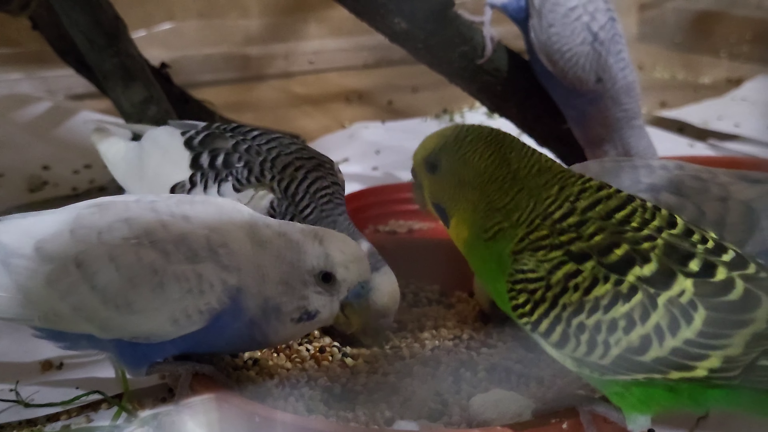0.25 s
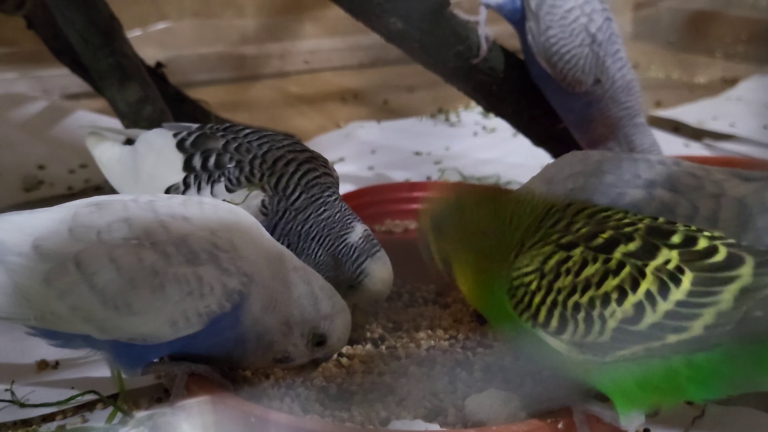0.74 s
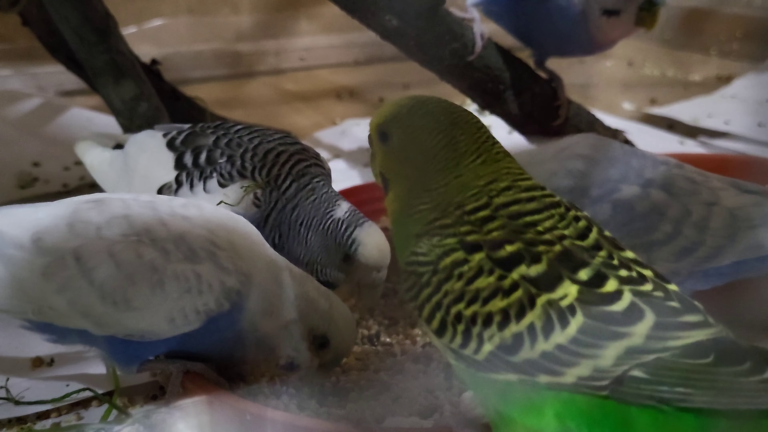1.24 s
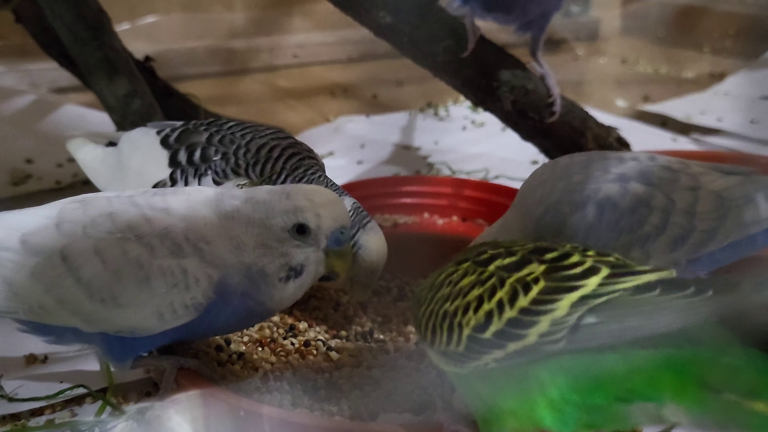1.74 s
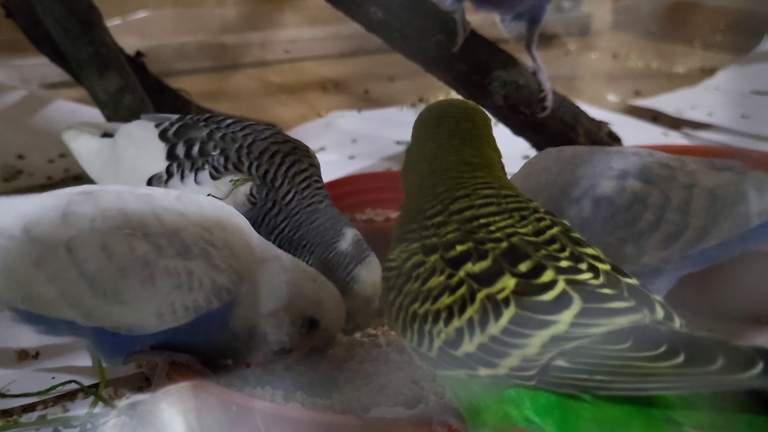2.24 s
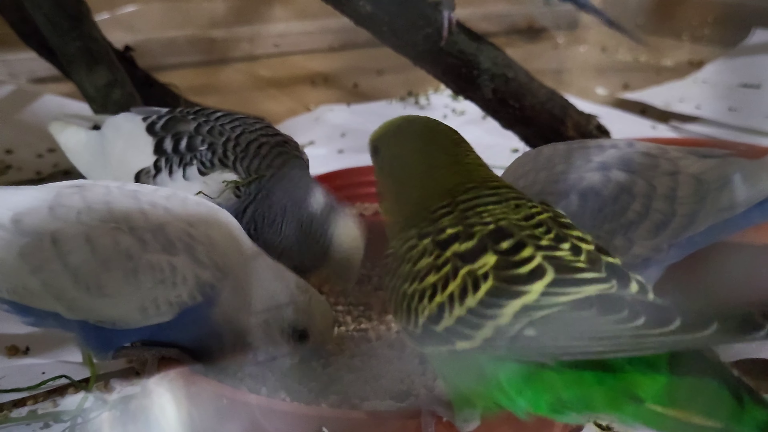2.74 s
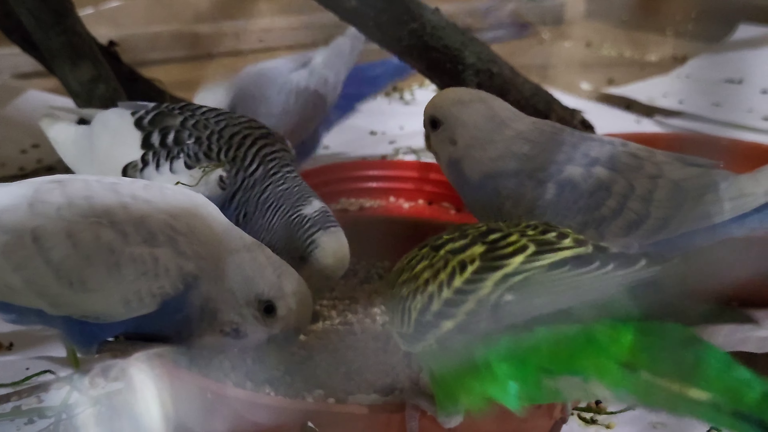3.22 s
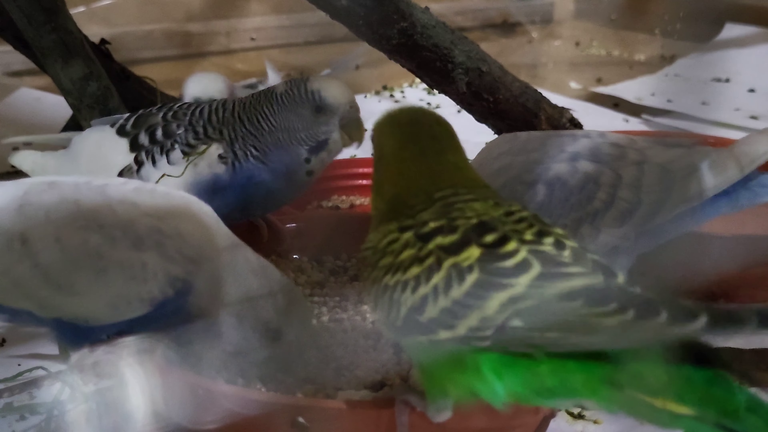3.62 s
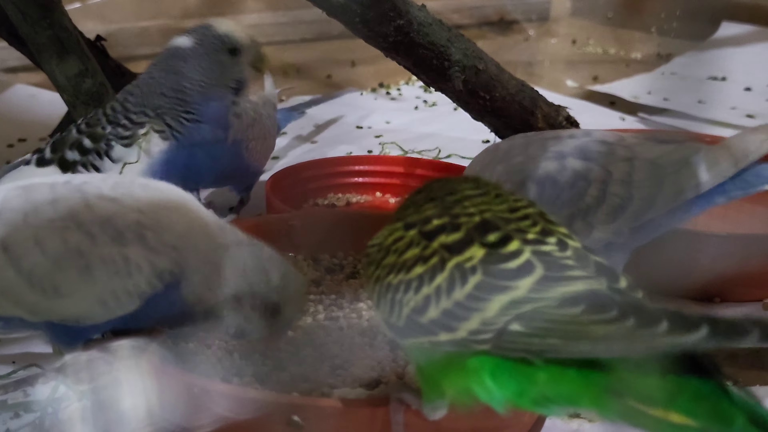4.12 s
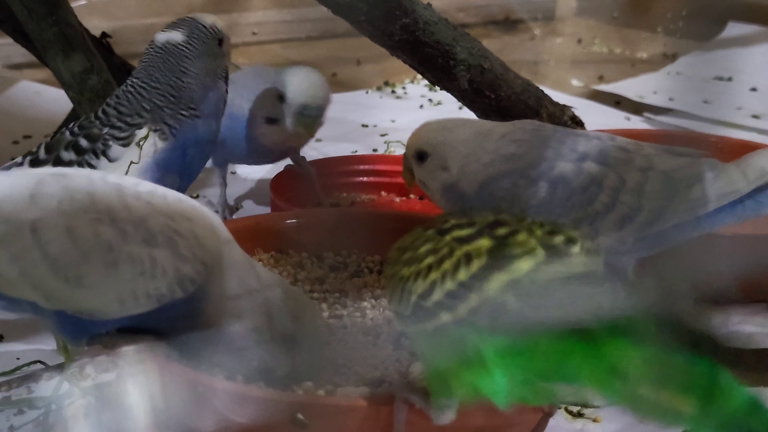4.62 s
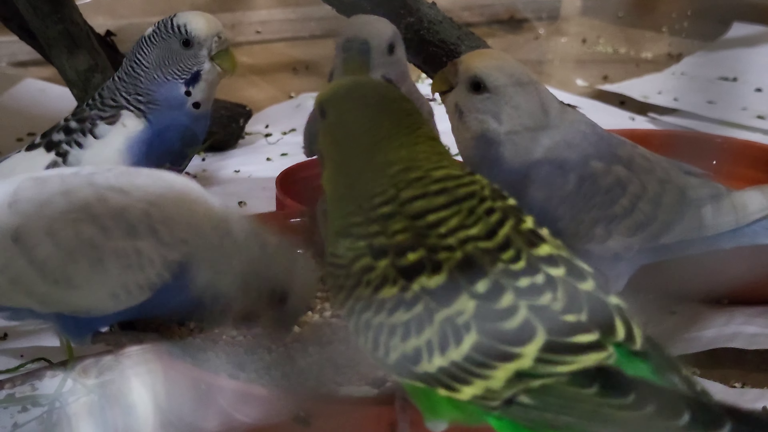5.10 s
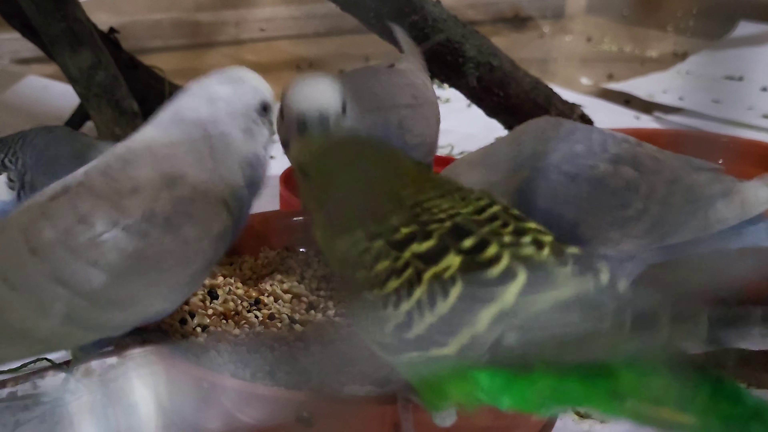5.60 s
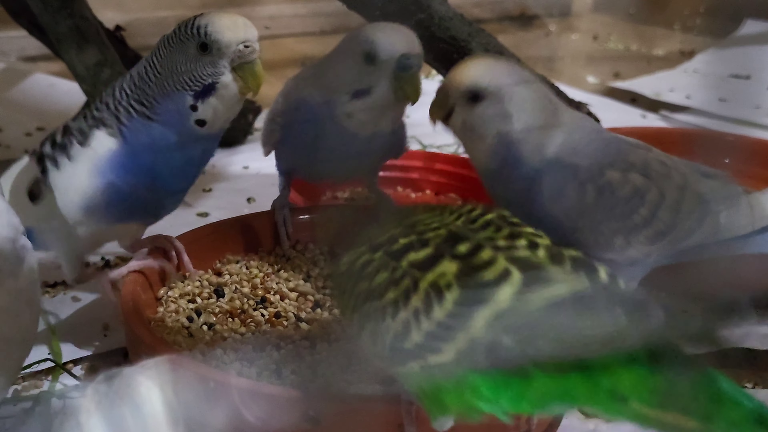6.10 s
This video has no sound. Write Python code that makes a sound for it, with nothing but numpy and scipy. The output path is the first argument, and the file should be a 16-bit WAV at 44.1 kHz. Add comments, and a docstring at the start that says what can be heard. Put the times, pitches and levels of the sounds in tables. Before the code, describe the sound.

Small birds feed at a seed dish: bright clicks, faint nibbling, dull taps, tiny chups and late wing scuffles above a steady drone.

```python
"""A fan drones throughout, narrow bands of noise over the soft rush of a quiet small room.
Left of centre and close to the microphone, budgerigars feed from seed dishes: husks crack as
bright bursts of noise, beaks turn seeds in faint ticks and knock a damped, ringing dish.
Feathers rustle as crackling, filtered noise and snap in duller bursts as the birds shove and flutter;
they mutter short chups, each a few harmonics. Early echoes and a short tail answer the birds."""
import sys
import numpy as np
from scipy import signal
from scipy.fft import rfft, irfft
from scipy.io import wavfile
from scipy.ndimage import uniform_filter1d

SR = 44100
rng = np.random.default_rng(int(sys.argv[2]) if len(sys.argv) > 2 else 0)


def store_wav(level_fs):
    """Save 16-bit WAV to argv[1]."""
    pcm = np.round(np.clip(np.atleast_2d(level_fs), -1, 1) * 32767)
    wavfile.write(sys.argv[1], SR, pcm.T.astype(np.int16))


N = 280035


def amp(db):
    """Decibels to gain."""
    return 10 ** (np.asarray(db) / 20)


def unit(x):
    """Scales to an rms of 1."""
    return x / np.sqrt(np.mean(x ** 2) + 1e-20)


def read(points, hz):
    """Reads a table on a log-frequency axis."""
    f, value = np.transpose(points)
    return np.interp(np.log(hz + 1), np.log(f + 1), value)


def colour(x, points):
    """Filters by a spectrum in dB."""
    size = x.shape[-1]
    return irfft(rfft(x) * amp(read(points, np.fft.rfftfreq(size, 1 / SR))), size)


def pan(db):
    """Gains of the two channels for a left-right difference; positive leans left."""
    gains = amp([[db / 2], [-db / 2]])
    return gains / gains.mean()


def add(mix, s, sound):
    """Mixes a stereo sound in at time s."""
    part = mix[:, max(round(s * SR), 0):][:, :sound.shape[1]]
    part += sound[:, :part.shape[1]]


def wander(rate_hz):
    """Slow random movement, rms 1, mostly below rate_hz."""
    hz = np.fft.rfftfreq(N, 1 / SR)
    return unit(irfft(rfft(rng.standard_normal(N)) * np.exp(-(hz / rate_hz) ** 2), N))


# Rush of the empty room, spectrum: f/Hz, relative level/dB
AIR_SPECTRUM = [(12, -69), (20, -29), (96, -5.5), (120, 0.5), (182, -14.5), (248, -12.5), (310, -16.5),
                (357, -16.5), (678, -27), (1910, -36.5), (2390, -37), (5530, -47.5), (7730, -46),
                (10800, -57.5), (16000, -54.5)]
# How alike left and right hear that rush: f/Hz, correlation (0 to 1)
AIR_LIKENESS = [(30, 0.89), (120, 1), (250, 0.86), (500, 0.39), (1000, 0.051), (2500, 0.033), (8000, 0.03)]
AIR_DB = -49  # rms of the 500-2000 Hz band in the mean of the channels, before panning


def air(side_db=2.0):
    """The steady rush of the room is shaped noise, nearly mono in the bass and wide above."""
    hz = np.fft.rfftfreq(N, 1 / SR)
    a, b = rfft(rng.standard_normal((2, N)))
    alike = np.clip(read(AIR_LIKENESS, hz), 0, 1)
    right = alike * a + np.sqrt(1 - alike ** 2) * b
    z = np.array([a, right]) * amp(read(AIR_SPECTRUM, hz))
    middle_rms = irfft(z.mean(0) * (hz > 500) * (hz < 2000), N).std()
    return amp(AIR_DB) * pan(side_db) * irfft(z, N) / middle_rms


# Resonances of the fan: f/Hz, width/Hz (offset at which the band is 12 dB down),
# level/dB rms before the level curve
FAN_BANDS = [(80, 6.4, -47.5), (120.3, 9.6, -31), (125.4, 14, -42), (201.7, 24, -49.5), (250.1, 12.4, -46),
             (358, 20.6, -46.5), (583, 63, -56), (829.4, 19, -61.5), (1256, 360, -84), (2457, 22, -66.5)]
# Level of the deep drone over time: t/s, relative level/dB
DEEP_LEVEL = [(0.05, -25), (0.28, -25), (0.43, -31.5), (0.55, -24.5), (0.75, -22.5), (1.0, -29.5),
              (1.42, -24), (1.72, -31), (2.1, -24), (2.5, -28.5), (3.18, -24), (3.6, -29.5), (3.9, -25.5),
              (4.73, -27), (4.9, -31.5), (5.1, -21), (5.3, -28), (6.3, -26)]


def fan(side_db=-0.5, window_s=0.17):
    """Narrow bands of noise; the deep ones follow a level curve that stands for their chance wavering."""
    hz = np.fft.rfftfreq(N, 1 / SR)
    deep, high = np.zeros(N), np.zeros(N)
    for centre, width, db in FAN_BANDS:
        phases = np.exp(2j * np.pi * rng.random(len(hz)))
        band = irfft(phases / (1 + ((hz - centre) / width) ** 2) ** 2, N)
        part = deep if centre < 170 else high
        part += amp(db) * unit(band)
    # the noise's own slow level is divided out, so that the table sets the level
    own_level = unit(np.sqrt(uniform_filter1d(deep ** 2, int(window_s * SR))))
    level_curve = unit(amp(np.interp(np.arange(N) / SR, *np.transpose(DEEP_LEVEL))))
    return pan(side_db) * (deep * level_curve / own_level + high)


# Decay of the small room: f/Hz, time to fall 60 dB/s
ROOM_DECAY = [(300, 0.13), (1500, 0.29), (3000, .40), (8000, 0.23), (16000, 0.18)]


def room(x, near_db, tail_db, size=22050, count=12):
    """Early echoes from dishes and cage, then a short diffuse tail that fades at its own rate per band."""
    t = np.arange(size) / SR
    noise = rng.standard_normal((2, size)) * (1 - np.exp(-t / 0.00068))
    hz, when, z = signal.stft(noise, SR, nperseg=256)
    fade = amp(-60 * when / read(ROOM_DECAY, hz)[:, None])
    tail = signal.istft(z * fade, SR, nperseg=256)[1][:, :size]
    response = amp(tail_db) * tail / np.linalg.norm(tail[0])
    for channel in response:
        delay_s = 0.001202 + .012 * rng.random(count) ** 2
        taps = rng.choice([-1, 1], count) * np.exp(-delay_s / 0.022)
        channel[(delay_s * SR).astype(int)] += amp(near_db) * taps / np.linalg.norm(taps)
    source = unit(x[0] + .5 * x[1]) * np.sqrt(np.mean(x ** 2))
    return x + pan(3.2) * signal.fftconvolve(source[None], response, axes=1)[:, :N]


# How the right channel hears the birds: f/Hz, level/dB
RIGHT_SIDE = [(2000, 1.5), (4500, 2.5), (6000, -4), (9000, 5), (12000, 5.5), (15500, 0)]


def from_left(x, lag_samples=3):
    """The birds are left of centre: the right side hears them a few samples later and coloured."""
    return np.array([x[0], np.roll(colour(x[1], RIGHT_SIDE), lag_samples)])


# Beaks knocking on the dish: t/s, relative level/dB
KNOCKS = [(0.607, -41.5), (1.7507, -35.5), (3.277, -36), (3.3932, -36), (4.5, -35.5), (4.744, -37),
          (4.977, -41.5), (5.127, -45.5)]
# Modes of the seed-filled dish: nominal f/Hz, relative level/dB, time to fall 60 dB/s
DISH_MODES = [(1380, 9, 0.0048), (1940, 1.5, 0.006), (2480, -14, 0.0063)]


def knocks(level_db=9, side_db=4, size=700):
    """A beak reaches through the seed and hits the dish, whose modes the seed damps at once."""
    t, out = np.arange(size) / SR, np.zeros((2, N))
    onset = 1 - np.exp(-t / 0.00046)
    for s, db in KNOCKS:
        shifts = rng.uniform(0.77, 1.3, len(DISH_MODES))  # each knock detunes the modes
        ring = np.zeros(size)
        for (hz, mode_db, t60), shift in zip(DISH_MODES, shifts):
            ring += amp(mode_db - 60 * t / t60) * np.sin(2 * np.pi * hz * shift * t)
        add(out, s, amp(level_db + db) * pan(side_db) * ring * onset)
    return out


def click(spectrum, treble_db, body_db, ring_hz, rise, decay, after_db, after, alike, size=1024, lead_in=64):
    """A fracture: noise swells and dies within milliseconds, with one resonance of the thing that broke."""
    t = np.maximum(np.arange(size) - lead_in, 0) / SR  # rise, decay and after are in seconds
    hz = np.fft.rfftfreq(size, 1 / SR)
    shape = (1 - np.exp(-t / rise)) ** 2 * (np.exp(-t / decay) + amp(after_db) * np.exp(-t / after))
    noise = rng.standard_normal((3, size))
    z = rfft((noise[:2] + alike * noise[2]) * shape)  # the third noise is common to both sides
    z /= np.sqrt(uniform_filter1d(abs(z) ** 2, size=50, axis=1))  # every band gets its share of the energy
    z *= 1 + 1.4 / (1 + 1j * (hz - ring_hz) / 380)
    tilt = [(4000, body_db), (5000, 0), (9000, 0), (11000, treble_db)]
    return irfft(z * amp(read(spectrum, hz) + read(tilt, hz)))


# Spectrum of a splitting husk, before each tick's ring and tilt: f/Hz, relative level/dB
HUSK_SPECTRUM = [(500, -19), (1200, -0.5), (2600, 2.5), (4000, -2.5), (5500, 0.5), (7600, 2), (9500, 0.5),
                 (12000, 4), (15000, 7), (17000, 9)]


def nibbling(count=70, ticks=3, bout_s=.05, faintest_db=-35, spread_db=14):
    """Seeds turned in beaks and shifted in the dish: little bouts of faint ticks, most barely there."""
    out = np.zeros((2, N))
    for start, side in rng.random((count, 2)):
        for when, strength, treble, body, ring in rng.random((ticks, 5)):
            tick = click(HUSK_SPECTRUM, -14 + 12 * treble, -8 + 10 * body, 4000 + 5000 * ring,
                         rise=0.00024, decay=0.00074, after_db=-34, after=0.0027, alike=0.21)
            gain = amp(faintest_db + spread_db * strength ** 2)
            add(out, start * N / SR + bout_s * when, gain * pan(-3 + 11 * side) * tick)
    return out


def catches(per_s=300, spread_db=6.5, count=10):
    """Separate little snags of barbs and seeds at random instants, each kind with its own ring."""
    out = np.zeros((2, N))
    for ring_hz in np.geomspace(2500, 9000, count):
        strength = amp(spread_db * np.minimum(rng.exponential(1, N), 2.5))
        train = (rng.random(N) < per_s / count / SR) * strength
        snag = click([(100, 0), (17000, 0)], 0, 0, ring_hz,
                     rise=.0003, decay=.0005, after_db=-25, after=.003, alike=.6)
        out += signal.oaconvolve(train[None], snag, axes=1)[:, :N]
    return unit(out)


STROKE_ATTACK_S, STROKE_RELEASE_S = 0.011, 0.019


def stroke(t, length):
    """A stroke takes hold quickly, lasts its length, then the feathers settle; t is seconds after its start."""
    return np.clip(t / STROKE_ATTACK_S, 0, 1) * np.exp(-np.maximum(t - length, 0) / STROKE_RELEASE_S)


# Feather strokes as the birds shove and flutter: start t/s, length/s, relative level/dB
STROKES = [(3.239, 0.039, -29.5), (3.35, 0.17, -47.5), (3.68, .1, -56), (3.985, 0.019, -36.5),
           (4.08, 0.2, -42.5), (4.264, 0.076, -34.5), (4.372, 0.12, -42.5), (4.72, 0.13, -45.5),
           (5.32, 0.051, -39), (5.406, 0.03, -34), (5.733, 0.1, -39), (5.87, 0.091, -38.5),
           (5.95, 0.11, -34.5), (6.201, 0.11, -38)]
# Spectrum laid on the rustle of feathers: f/Hz, relative level/dB
FEATHER_SPECTRUM = [(710, -52), (1200, -9), (1570, -25), (1680, -2.5), (1870, -17), (2300, -9.5),
                    (3590, -4), (4040, -3), (5710, -0.5), (7820, -0.5), (11700, -16.5), (15200, -8),
                    (16000, -14), (17000, -50)]


def feathers(level_db=-2, flutter_db=2, side_db=5, thrust_db=-12):
    """Barbs slip over each other: a crackle in an uneven swish, with a lower push of air in each stroke."""
    t = np.arange(N) / SR
    effort = np.max([amp(db) * stroke(t - start, length) for start, length, db in STROKES], axis=0)
    swish = amp(-5.5) * rng.standard_normal((2, N))
    slips = (catches() + swish) * amp(flutter_db * wander(39))
    rustle = unit(colour(slips, FEATHER_SPECTRUM))
    thrust = unit(colour(slips, [(100, -27), (500, 11), (1200, -10), (2500, -10), (6000, -39)]))
    return amp(level_db) * pan(side_db) * effort * (rustle + amp(thrust_db) * thrust)


# Wing tips and claws striking: t/s, relative level/dB, body below 4 kHz against 5-9 kHz/dB, ring f/Hz
SNAPS = [(3.2401, -24, -5, 7100), (3.2643, -22.5, -0.5, 7200), (3.2713, -36, 2, 7650),
         (3.3536, -24.5, -10.5, 5860), (3.4605, -29, -0.5, 5700), (3.997, -28.5, 0.5, 3970),
         (4.1109, -32, 3.5, 5330), (4.149, -23, -3.5, 5800), (4.3242, -25.5, 1, 5700),
         (4.459, -28.5, -11, 7550), (5.3484, -16, -5, 7700), (5.449, -26, -18, 5640),
         (5.7316, -17.5, 1.5, 6530), (5.759, -19, -3, 6200), (5.8726, -28.5, -6, 7200),
         (5.9425, -11, -2, 7050), (5.9984, -18.5, -16, 7040), (6.0175, -22.5, -1.5, 7750),
         (6.094, -28, -12, 5600), (6.213, -28, 0, 7200), (6.2573, -24, -10, 7550), (6.2737, -32, 4, 6600),
         (6.3038, -20.5, -8, 6000)]
# Spectrum of a struck quill, before each snap's ring and tilt: f/Hz, relative level/dB
QUILL_SPECTRUM = [(300, -1.5), (1200, -8), (2500, 0), (3600, 3.5), (4500, 2), (7000, 1), (9000, -6),
                  (12000, 0), (15000, -4), (17000, -10)]
SNAP_TREBLE_DB = -10  # treble above 10 kHz at the usual strength
SNAP_DULLING = 0.29  # dB of treble lost for each dB that a blow is harder than usual


def wings(level_db=21.0, lead_s=0.0024, side_db=8):
    """Stiff feathers and claws strike the rim and the paper: duller and longer than a husk."""
    out = np.zeros((2, N))
    usual_db = np.mean([row[1] for row in SNAPS])
    for s, db, body_db, ring_hz in SNAPS:
        treble_db = SNAP_TREBLE_DB - SNAP_DULLING * (db - usual_db)
        snap = click(QUILL_SPECTRUM, treble_db, body_db, ring_hz,
                     rise=0.00024, decay=0.00035, after_db=-5, after=0.0032, alike=0.16)
        add(out, s - lead_s, amp(level_db + db) * pan(side_db) * snap)
    return out


# Chups: middle t/s, length/s, pitch f/Hz, rise/octaves, level/dB, tilt/dB per harmonic, overtone reach f/Hz
CHUPS = [(0.7, 0.0056, 1214, 0.2, -20, -4.5, 3470), (0.7878, 0.0039, 2130, 0.54, -26, -22, 6000),
         (4.5636, 0.003, 2240, -0.6, -33.5, -15, 6000), (4.588, 0.0031, 2220, 0.41, -30.5, -3, 6540),
         (4.7106, 0.010, 2005, 0.37, -33, 3, 6300), (4.8162, 0.0064, 1487, -0.27, -19.5, -8.5, 6000),
         (4.983, 0.0074, 2060, 0.27, -37, -3, 7000), (5.2102, 0.0066, 1733, 0.21, -28.5, 0, 5250),
         (5.298, .006, 1333, -0.28, -26.5, -5, 6500), (5.515, .008, 1254, -0.044, -22, -1.5, 6540),
         (5.6637, 0.0061, 1780, 0.27, -24.5, -15.5, 7000), (6.3046, 0.0038, 3630, -.15, -23, -7, 8000)]
THROAT_HZ, THROAT_WIDTH_HZ, THROAT_DB = 3730, 370, 4  # one resonance lifts the overtone nearest to it
BEYOND_REACH_DB_PER_OCTAVE = 32


def chups(arch=0.11, rasp=0.32, rough=0.047, side_db=9.0):
    """A chup is a few cycles of the syrinx: pitch arches, and overtones open at the height of the note."""
    out = np.zeros((2, N))
    k = np.arange(1, 9)[:, None]  # harmonic numbers
    for s, length, hz, rise, note_db, tilt_db, reach_hz in CHUPS:
        u = np.linspace(-1, 1, int(length * SR))  # start to end of the note
        knots = np.linspace(-1, 1, 32)
        jitter, shimmer = (np.interp(u, knots, row) for row in rng.standard_normal(size=(2, 32)))
        octaves = rise * u / 2 - arch * u ** 2 + rough * jitter
        turns = np.cumsum(hz * 2 ** octaves) / SR
        throat_db = THROAT_DB / (1 + ((k * hz - THROAT_HZ) / THROAT_WIDTH_HZ) ** 2)
        beyond_db = BEYOND_REACH_DB_PER_OCTAVE * np.log2(np.maximum(k * hz / reach_hz, 1))
        db = note_db + tilt_db * (k - 1) + throat_db - beyond_db
        opening = np.maximum(np.cos(np.pi * u / 2), 0) ** (0.5 + 0.037 * k)
        harmonics = amp(db) * opening * np.sin(2 * np.pi * k * turns)
        note = harmonics.sum(0) * (1 + rasp * shimmer)
        add(out, s - length / 2, pan(side_db) * note)
    return out


# Husks cracking: t/s, relative level/dB, treble above 10 kHz against 5-9 kHz/dB, left-right difference/dB
CRACKS = [(0.1518, -27, 2, 5.0), (0.309, -38, -12, 7.5), (0.4267, -19.5, -11, 8), (0.564, -40, -6, 9.0),
          (0.5809, -24.5, -12, 6), (0.8593, -39, -13, 8), (1.0057, -32, 4, 2.5), (1.0178, -27.5, 7.5, 8),
          (1.057, -28.5, -9, 8.0), (1.1274, -34, -5, 7.0), (1.212, -27, -14, 7), (1.4784, -39.5, -16, 15),
          (1.6464, -22.5, -7, 10), (1.9001, -39, -17, 4.5), (2.1276, -29.5, -8, 4), (2.6756, -32.5, -9, 6),
          (2.8326, -27.5, -3.5, 5), (3.0081, -40, -10, 5), (3.1476, -34.5, -10, 9), (3.188, -31.5, -6, 11),
          (3.5638, -28, -19, 10), (3.7424, -26.5, -22, 6), (3.7821, -32, -13, 8.5), (3.8474, -27, -8, 11),
          (4.8872, -27, -10, 8), (4.9741, -32.5, -7, 8), (5.081, -32.5, -4, 3), (5.682, -21.5, -18, 8),
          (6.1995, -27.5, -2, 4)]
HUSK_RING_HZ, HUSK_BODY_DB = 7520, -5  # every husk rings alike and has little body below 4 kHz


def beaks(level_db=17.0, lead_s=0.0028):
    """Seed husks split with one dry, bright tick each."""
    out = np.zeros((2, N))
    for s, db, treble_db, side_db in CRACKS:
        tick = click(HUSK_SPECTRUM, treble_db, HUSK_BODY_DB, HUSK_RING_HZ,
                     rise=0.00041, decay=0.00015, after_db=-42.5, after=0.0042, alike=0.5)
        add(out, s - lead_s, amp(level_db + db) * pan(side_db) * tick)
    return out


def scene(near_db=-17):
    """The birds in their room, over the fan."""
    seeds = room(beaks() + nibbling() + knocks(), near_db, tail_db=-13.5)
    scuffle = room(wings() + feathers(), near_db, tail_db=-7.5)
    calls = room(chups(), near_db=-13, tail_db=-13)
    return from_left(seeds + scuffle + calls) + air() + fan()


EDGE_HZ = 16200  # upper band limit


def record(dry):
    """Full-scale clipping, then the band limit."""
    lowpass = signal.firwin(201, EDGE_HZ, window=("kaiser", 8), fs=SR)
    return signal.oaconvolve(np.clip(dry, -1, 1), lowpass[None], "same")


dry = scene()
out = record(dry)
store_wav(out)
```